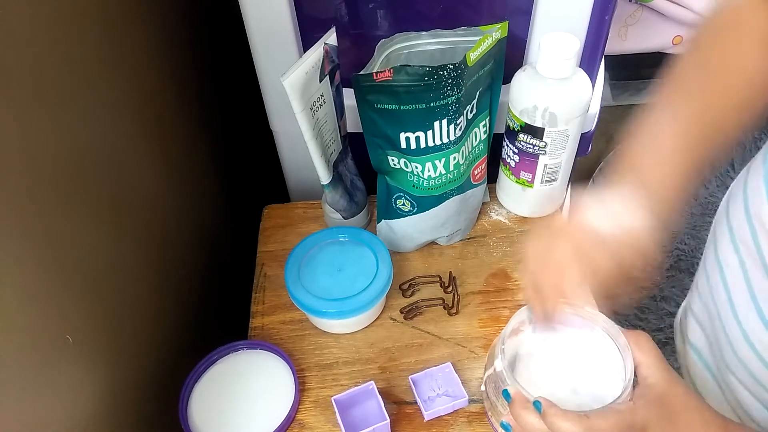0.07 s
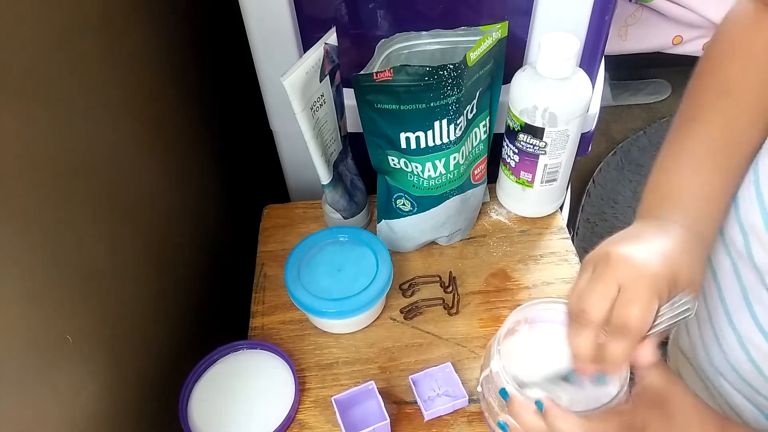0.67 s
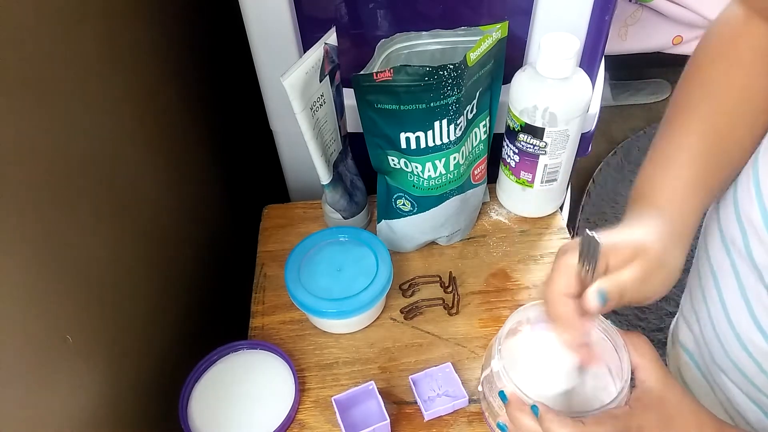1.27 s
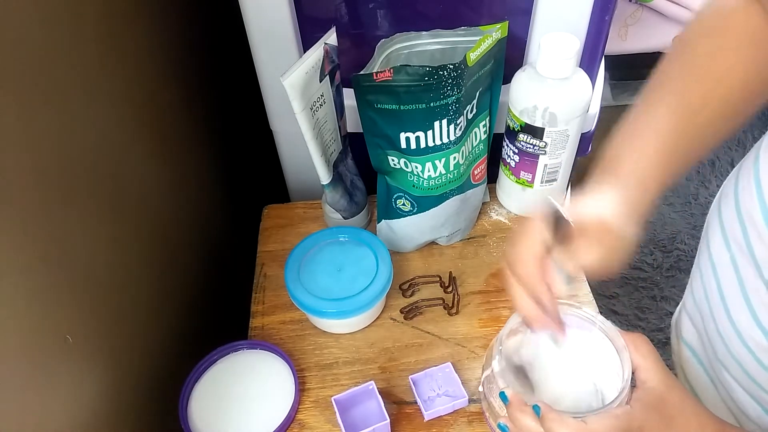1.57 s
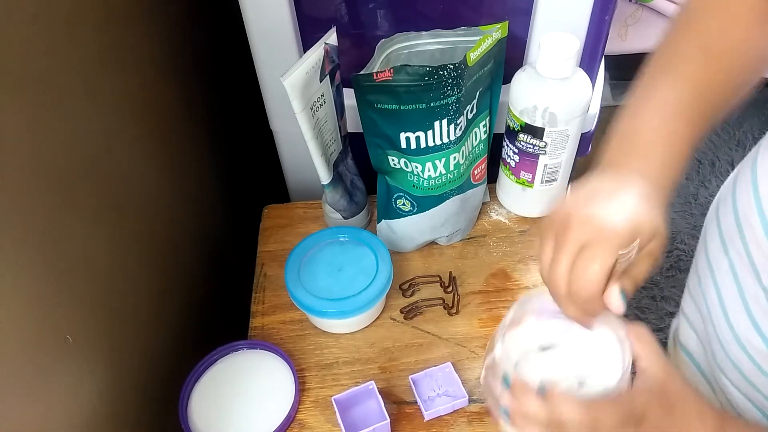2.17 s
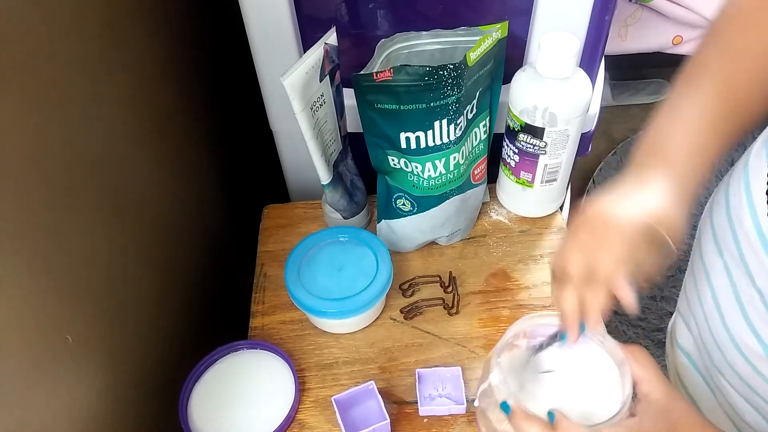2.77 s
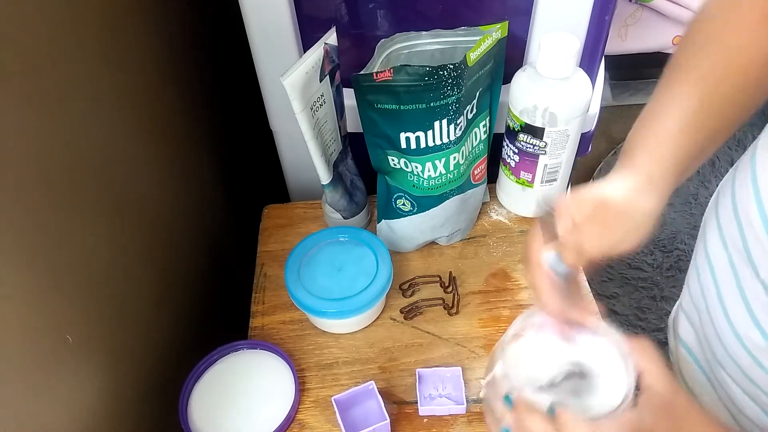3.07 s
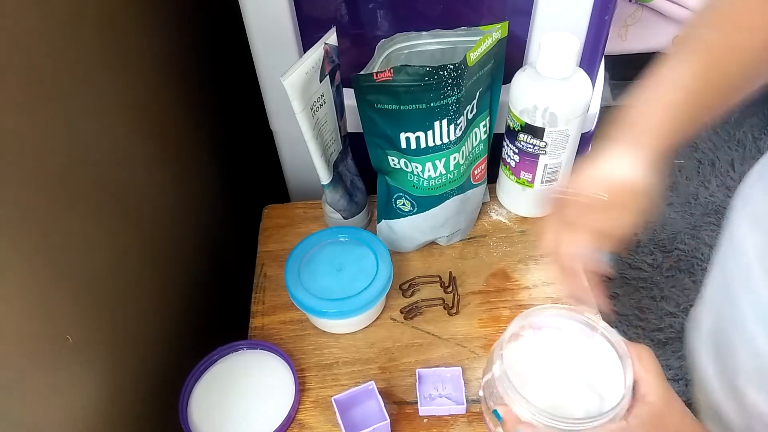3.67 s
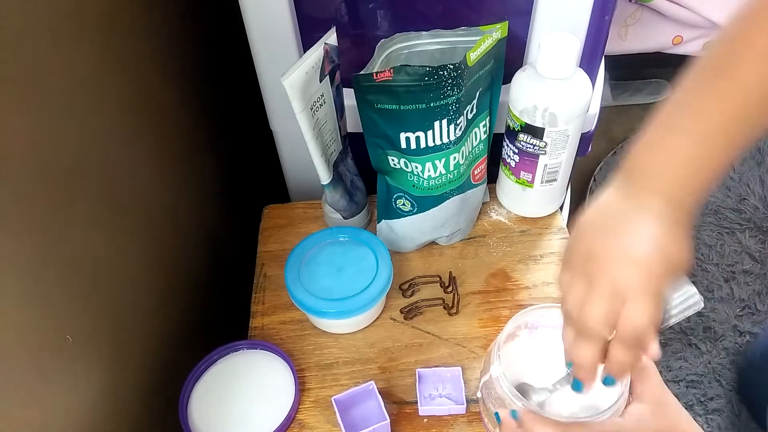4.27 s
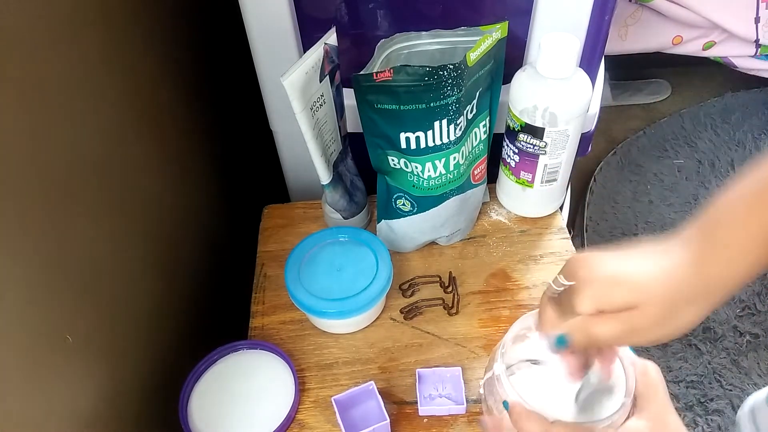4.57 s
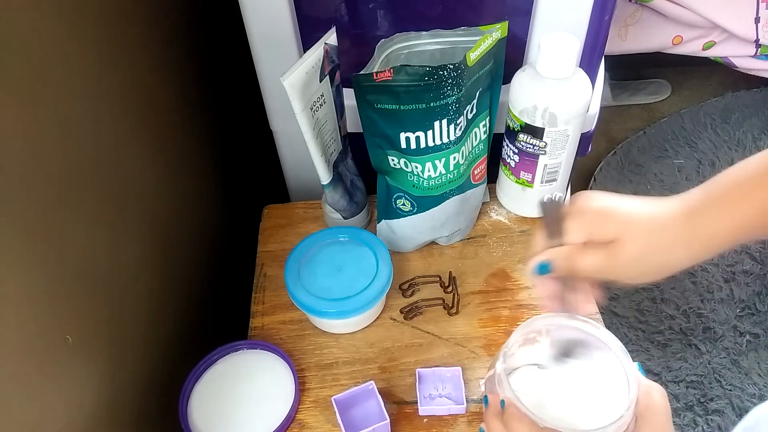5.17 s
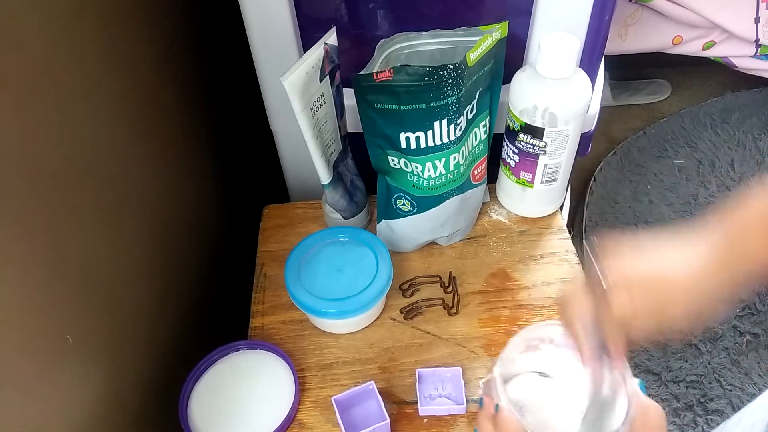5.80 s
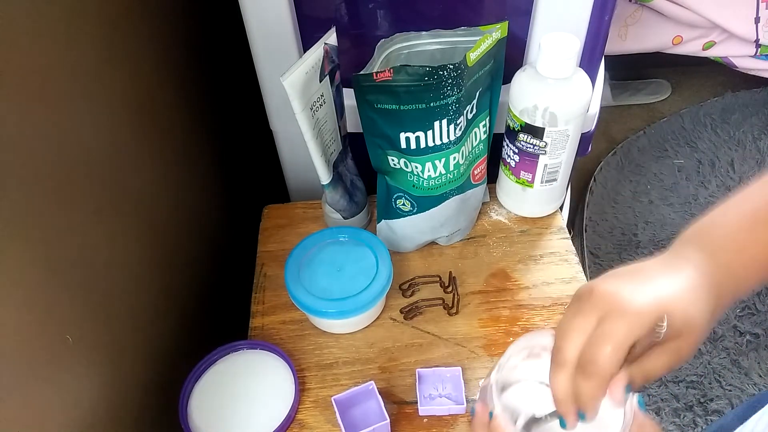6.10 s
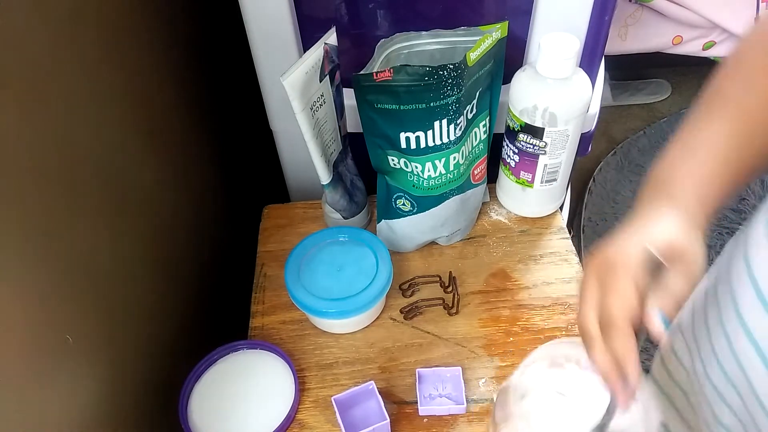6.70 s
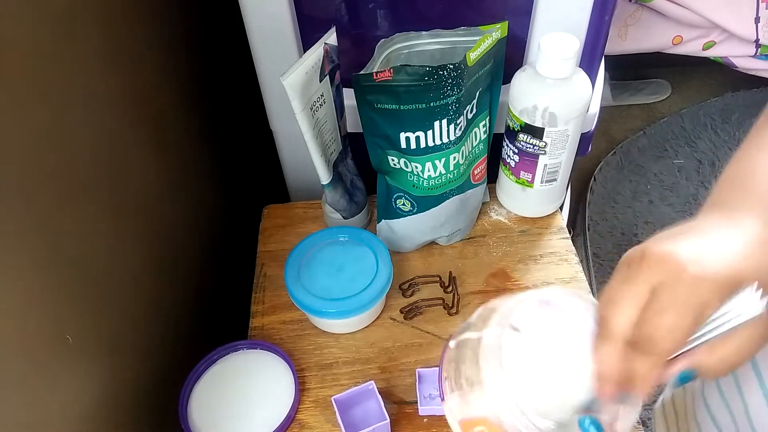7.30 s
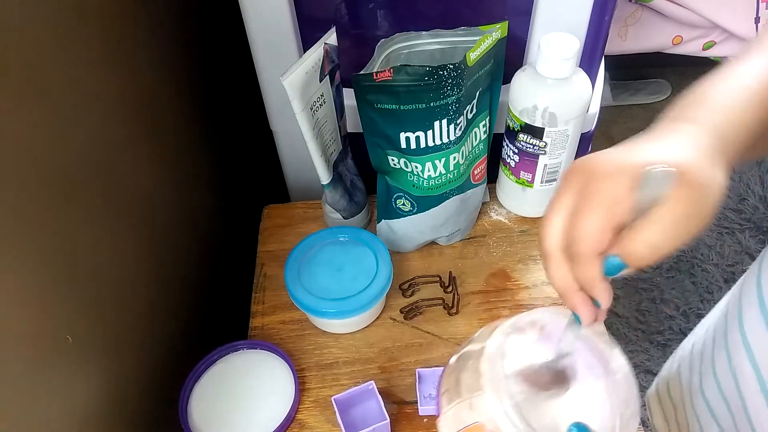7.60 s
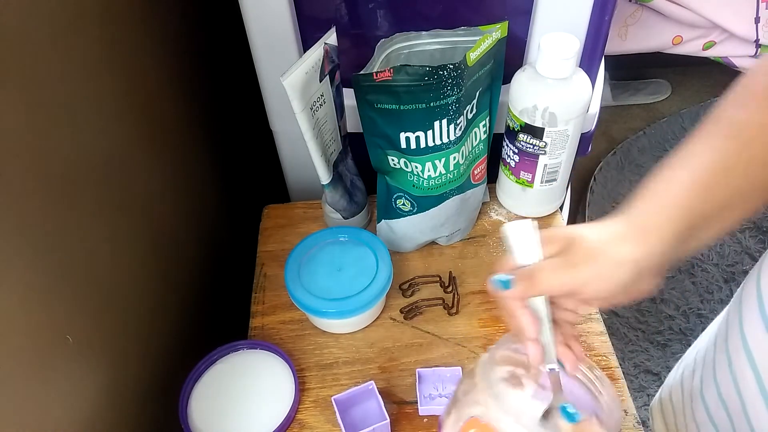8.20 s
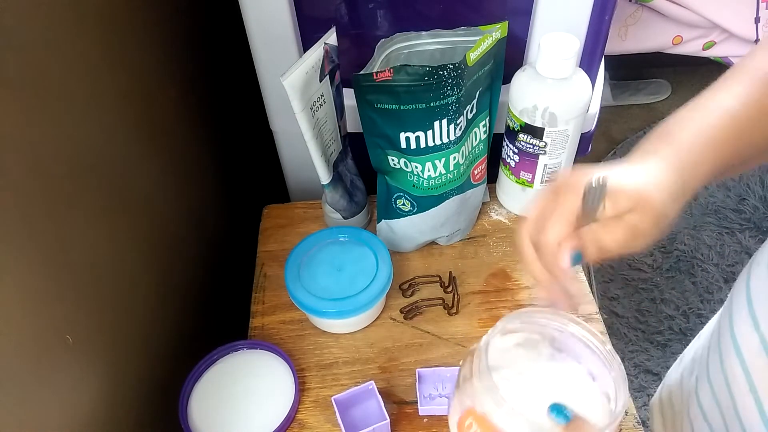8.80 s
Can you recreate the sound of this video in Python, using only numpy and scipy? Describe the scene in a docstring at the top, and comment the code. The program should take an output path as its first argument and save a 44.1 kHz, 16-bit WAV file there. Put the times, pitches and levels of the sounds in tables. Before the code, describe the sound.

Close up in a small room, a metal spoon knocks quickly and irregularly against a plastic cup as it works through slime. Some hits are sharp clacks, others cushioned plops, and the slime fizzes, snaps and gurgles between them. Short gritty scrapes come mostly in the first part. Underneath, the cup bumps a wooden table and slides with a brief low drone. Near the end, plops take over before a last few clacks.

```python
"""First come quick clacks: a metal spoon hits a plastic cup as it stirs sticky slime in a small room.
Bare blows ring the cup wall and pop the air inside; blows cushioned by slime only plop.
Each stroke rubs the wall and makes the slime crackle, snap and gurgle.
The cup is held down on a wooden table: shoves thump the table top, and when the cup drags
it rumbles, then settles into a low drone."""
import sys
import numpy as np
from scipy import signal
from scipy.io import wavfile
from scipy.ndimage import uniform_filter1d

SR = 44100
rng = np.random.default_rng(int(sys.argv[2]) if len(sys.argv) > 2 else 0)


def store_wav(level_fs):
    """Save 16-bit WAV to argv[1]."""
    pcm = np.round(np.clip(np.atleast_2d(level_fs), -1, 1) * 32767)
    wavfile.write(sys.argv[1], SR, pcm.T.astype(np.int16))


N = 390285

# tone of the quiet room: f/Hz, level/dB
ROOM_COLOUR = [(20, -16.5), (70, -7), (200, -7.5), (400, -13), (1200, -18.5), (4000, -23.5), (7500, -19.5),
               (10000, -27), (16000, -50)]
# how long the room rings (t60 is the time to fade by 60 dB): f/Hz, t60/s
ROOM_DECAY = [(150, 0.64), (700, 0.19), (2500, 0.17), (7000, 0.19), (14000, 0.18)]
# early echoes off the table and the room's wall: delay/s, level/dB
EARLY_ECHOES = [(0.0095, -21), (0.023, -19)]

# the cup drags on the table: t/s, length/s, level/dB, starting rumble over drone/dB, drone f/Hz
CUP_DRAGS = [(0.62, 0.29, -45.5, 8, 113.3), (1.762, 0.26, -47, 2.5, 110.7), (2.145, 0.045, -48, 14, 115.3),
             (2.388, 0.097, -60, 1, 89.4), (2.518, 0.081, -47, 2, 110), (2.676, 0.21, -61.5, -4.5, 97.2),
             (3.024, 0.33, -44.5, 3.5, 119.8), (3.629, 0.2, -50, 3, 113), (3.788, 0.093, -45.5, 7.5, 109.9),
             (4.203, 0.083, -45, 2, 118.3), (4.439, 0.057, -53, -4, 115.7), (4.776, 0.075, -52, 26, 108),
             (4.964, 0.085, -57, 7, 97), (5.075, 0.097, -46, 1, 72), (5.732, 0.092, -52, 25, 106),
             (6.155, 0.23, -47, 14, 110.7), (6.593, 0.068, -48, 5, 113.3), (6.724, 0.19, -51, -8.5, 111),
             (7.751, 0.34, -46.5, 0, 110.3), (8.518, 0.36, -51.5, 5, 105.2)]
# tone of the dragging rumble: f/Hz, level/dB
DRAG_COLOUR = [(20, -25.5), (35, -11), (55, -5), (85, -2), (120, -4.5), (170, -1), (240, -12.5), (340, -34),
               (900, -53.5), (3000, -85.5)]
# the cup is shoved against the table: t/s, level/dB, hardness/dB
CUP_SHOVES = [(.008, -42, 5), (0.145, -35.5, -1.5), (0.212, -55.5, -3), (0.319, -51, -1),
              (1.107, -44.5, 3.5), (1.2801, -27.5, 0), (1.358, -39.5, -3.5), (1.593, -42, 0.5),
              (1.687, -53, -2.5), (1.712, -47.5, -3.5), (2.058, -39.5, -2), (2.151, -34.5, 15),
              (2.962, -40, 18), (3.485, -42, 3), (3.61, -42, 3.5), (3.858, -46, 5), (4.35, -33.5, 0.5),
              (4.44, -33.5, 3.5), (4.491, -42.5, 1), (4.735, -49, 8.5), (4.82, -37, 0.5), (5.616, -47, 4.5),
              (5.711, -43.5, 3), (5.828, -29.5, 1), (5.966, -51.5, 4), (6.053, -46.5, 3), (6.16, -26, 0.5),
              (6.591, -33, -1.5), (8.71, -43, 14), (8.787, -43, -1.5)]
# notes the table top rings at: f/Hz, level/dB, t60/s
TABLE_MODES = [(72, -28.5, 0.1), (123, 3, 0.14), (171.5, 5, 0.095), (218.5, 2.5, 0.11), (273, -12, 0.22),
               (338, -3.5, 0.023), (431, -16, 0.062)]

# the spoon slides along the wall: t/s, length/s, level/dB, ring f/Hz, ring width/Hz, air level/dB
WALL_SCRAPES = [(0.463, 0.28, -54.5, 2930, 900, -5), (0.7, .26, -61.5, 2400, 900, -19),
                (1.157, 0.24, -57, 2700, 600, -13), (1.39, 0.29, -64, 2900, 700, -14),
                (1.677, 0.077, -53, 1060, 400, 5), (2.327, 0.17, -49, 1510, 380, -1.5),
                (2.521, 0.031, -48.5, 1724, 261, -8), (2.592, 0.12, -55, 1620, 403, -12),
                (2.811, 0.17, -46, 1920, 492, -6.5), (2.956, 0.12, -35, 4200, 2500, -16),
                (3.319, 0.064, -38, 1890, 260, -13.5), (8.692, 0.058, -48, 2500, 700, 5),
                (8.789, 0.017, -43.5, 2750, 420, -4.5), (8.79, 0.085, -54.5, 2740, 199, -10)]
# the spoon moves through the slime: t/s, length/s, fizz level/dB, smear level/dB, gurgle level/dB
SLIME_STROKES = [(0.017, 0.15, -50.5, -55, -52.5), (0.298, 0.065, -49.5, -55, -60),
                 (0.586, 0.061, -53, -42.5, -50.5), (0.708, 0.27, -52.5, -60, -57),
                 (1.065, 0.16, -53.5, -49.5, -55.5), (1.339, 0.082, -46.5, -46.5, -59.5),
                 (1.573, 0.028, -44.5, -41, -48), (1.694, 0.1, -60.5, -60.5, -62),
                 (2.16, 0.047, -37, -44, -38), (2.211, 0.033, -46.5, -38, -57.5),
                 (2.576, 0.037, -47, -38.5, -53), (2.83, 0.16, -51, -49.5, -45),
                 (2.957, 0.091, -39, -32, -38.5), (3.098, 0.082, -41.5, -37.5, -40.5),
                 (3.325, 0.0072, -46, -47.5, -44.5), (3.599, 0.11, -49, -49, -46.5),
                 (3.846, 0.022, -45, -41.5, -41.5), (3.969, 0.055, -61.5, -65, -73),
                 (4.278, 0.36, -52, -61, -67), (4.399, 0.15, -44, -57, -58.5),
                 (4.693, 0.044, -45, -46, -45.5), (4.882, 0.36, -70, -69, -58),
                 (5.002, 0.072, -65.5, -62.5, -55), (5.057, 0.071, -53, -59.5, -56),
                 (5.209, 0.2, -48.5, -53.5, -50), (5.488, 0.011, -46, -48, -52),
                 (5.598, 0.44, -53, -47.5, -43), (5.785, 0.17, -44.5, -43.5, -42),
                 (6.067, 0.17, -44, -42, -41.5), (6.258, 0.095, -51.5, -53.5, -51),
                 (6.39, 0.035, -60.5, -67, -74), (6.642, 0.1, -47.5, -53.5, -54),
                 (7.39, 0.059, -56, -59, -64), (7.445, 0.099, -48.5, -55, -67), (8.1, 0.089, -52, -50, -61),
                 (8.554, 0.21, -60.5, -58.5, -55.5)]
# tone of the fizz of tearing slime: f/Hz, level/dB
TEARING_COLOUR = [(1500, -38), (3500, -4.5), (5000, -1), (7200, 4.5), (9500, -6), (12000, -9.5),
                  (16000, -15.5)]
# tone of slime smeared on the wall: f/Hz, level/dB
STICKY_COLOUR = [(500, -39), (1100, -12.5), (1700, 3), (2700, 11.5), (4000, 5), (6000, -14), (12000, -39)]
# notes of wet hollows in the slime: f/Hz, width/Hz, level/dB
WET_HOLLOWS = [(490, 160, -0.5), (700, 330, 1.5), (1190, 230, -5)]

# notes of the filled cup's body: f/Hz, level/dB
BODY_MODES = [(428, -12.5), (568, -6.5), (680, -4.5), (900, -12.5), (1145, -24)]
# notes of the cup wall: f/Hz, width/Hz, level/dB
WALL_MODES = [(1380, 29, 1), (2068, 23, -2), (2510, 350, -4.5), (3400, 390, -8.5), (3700, 400, -3),
              (4500, 46, -3), (5350, 63, -7), (6000, 50, -5.5), (7480, 110, -8), (8000, 170, -5.5),
              (8950, 2400, -6)]
# slime on the wall damps those notes, most in dull blows: brightness/dB, extra width/Hz
SLIME_DAMPING = [(-11, 350), (-7, 8.9)]
# tone of a hit on the wall: f/Hz, level/dB
HIT_COLOUR = [(300, -24.5), (900, -5.5), (1400, -9.5), (2500, -1), (4200, -1.5), (7000, 6.5), (9500, -2.5),
              (12500, -8), (16000, -15.5)]
# blows cushioned by slime: t/s, air level/dB, air f/Hz, wall level/dB, body level/dB
SOFT_BLOWS = [(0.313, -56.5, 770, -67, -3), (0.379, -56.5, 720, -74, -6), (1.072, -53.5, 548, -69, 4),
              (1.7135, -41, 914, -53.5, -16), (1.783, -47.5, 760, -52, -22), (2.059, -43, 764, -44.5, -3),
              (2.8671, -23, 896, -26.5, -9), (3.6115, -31.5, 703, -36, -10), (3.961, -62, 1400, -58, -20),
              (4.019, -58, 890, -58.5, -15), (4.349, -42.5, 464, -41.5, 5), (4.439, -40.5, 408, -47, 6),
              (4.489, -45, 646, -63, -8), (4.523, -38.5, 710, -69, -4), (4.733, -57, 515, -47.5, 3),
              (5.278, -39, 810, -41, -16), (5.708, -23.5, 798, -26, -10), (5.831, -34.5, 687, -43, -7),
              (6.141, -46, 765, -44, 4), (6.589, -34.5, 807, -32.5, -2.5), (6.776, -56, 740, -63, -10),
              (7.2352, -25, 846, -36, -10.5), (7.441, -35.5, 795, -45, -9), (7.493, -46, 755, -48.5, -5.5),
              (7.597, -35.5, 751, -59.5, -5.5), (7.892, -34.5, 779, -44, -4), (8.7075, -51, 445, -50, -14),
              (8.7919, -28, 450, -51.5, -13)]
# ticks of the spoon's edge and snaps of slime leaving the wall: t/s, level/dB, brightness/dB, f/Hz
LIGHT_TICKS = [(0.101, -36, -6, 2930), (.132, -39, -16, 3270), (0.312, -43, 8, 4570),
               (0.343, -37, 27, 10200), (0.357, -35.5, 23, 8000), (0.658, -36, 11, 5530),
               (.719, -33.5, 10, 6000), (0.789, -38.5, 19, 8000), (0.868, -32, 12, 5660),
               (0.883, -39, 4, 6500), (0.943, -41, 35, 9400), (1.082, -44, 28, 3520),
               (1.169, -38, 9.5, 6170), (1.2048, -36, 11, 4800), (1.3795, -33, 11, 9100),
               (1.5804, -40, -2, 3720), (1.633, -35.5, -4, 4140), (1.794, -30.5, 13.5, 7450),
               (2.486, -42, -2.5, 1740), (2.785, -55.5, 9.5, 6500), (2.8306, -36, 15.5, 4670),
               (2.868, -30.5, 12, 6700), (2.9679, -20, 10, 5440), (3.03, -36, 12, 4560),
               (3.096, -26.5, 13, 4170), (3.116, -35.5, 1, 3530), (3.122, -28, 30.5, 5910),
               (3.1265, -32.5, 17.5, 8300), (3.681, -35, 1, 6960), (3.689, -39, -4, 4540),
               (3.771, -41, 22, 6400), (3.8202, -38, 11, 6640), (3.8621, -34, 5, 4600),
               (3.8792, -26, 1.5, 7450), (4.4878, -30.5, 6, 7200), (4.53, -35, 14, 5270),
               (4.945, -54, 18, 4540), (5.3538, -33, 12.5, 5540), (5.374, -39.5, 31, 8160),
               (5.5864, -34.5, 9.5, 6200), (5.635, -38, -10, 3100), (5.6425, -34, 2, 2950),
               (5.671, -37, 15.5, 8000), (5.758, -33, 7.5, 6150), (5.7818, -36, 6, 4430),
               (5.872, -26, 12, 6700), (5.8801, -31, 9, 6720), (6.0177, -33.5, 5.5, 7400),
               (6.035, -41.5, 24, 7900), (6.057, -27.5, 8.5, 7100), (6.1155, -33, -6, 5130),
               (6.1395, -27, 21, 6160), (6.276, -37, -1, 2450), (6.671, -41.5, -7, 6890),
               (6.706, -32.5, 26, 7600)]
# bare blows of the spoon: t/s, wall level/dB, brightness/dB, struck spot f/Hz, air level/dB, air f/Hz,
# knock f/Hz, knock level/dB, left minus right/dB
BARE_BLOWS = [(0.0075, -31, 9.5, 5970, -43.5, 423, 2230, -62, -3.5),
              (0.0419, -27, -4.5, 3730, -36, 810, 2220, -49, -2),
              (0.0865, -22, -5.5, 6800, -39.5, 726, 1980, -43.5, 0),
              (0.1385, -24.5, 11.5, 6700, -37.5, 736, 2200, -53, 2),
              (0.574, -25.5, -6.5, 3620, -45, 1084, 1690, -46, 0),
              (1.106, -26, 1, 3900, -38, 740, 1290, -34, 0.5),
              (1.2799, -26, -0.5, 1960, -31, 780, 1224, -34, -1.5),
              (1.3555, -21.5, 11.5, 8280, -38, 510, 2120, -80, -3.5),
              (1.5912, -28, -6.5, 3270, -36.5, 773, 1350, -55, 3),
              (1.8752, -32, 14, 5220, -38, 436, 1710, -57.5, -0.5),
              (1.9709, -19, 0.5, 3260, -30.5, 782, 1630, -39, -0.5),
              (2.152, -16.5, 9, 3740, -25.5, 774, 1410, -52, 0),
              (2.5832, -15, 2.5, 7330, -42, 1050, 1412, -28.5, 0.5),
              (2.9644, -16.5, 28, 5500, -29.5, 910, 2230, -46, 2),
              (3.3308, -17, 4, 3856, -33.5, 890, 1852, -28.5, -3.5),
              (4.268, -32, -6, 6750, -41, 740, 2030, -59, -1.5),
              (4.6685, -35.5, 3, 6230, -47.5, 900, 1840, -51.5, 1.5),
              (4.8227, -18, -1.5, 3410, -24, 700, 1816, -37, -5),
              (5.197, -33.5, 7, 7100, -37.5, 676, 2030.0, -62, 1),
              (5.2299, -25.5, -8, 3060, -29.5, 650, 1830, -39.5, -3),
              (5.2976, -28.5, -2, 2740, -41, 740, 1930.0, -49, 1.5),
              (5.615, -28.5, -3.5, 2670, -33, 680, 1170, -44.5, -2.5),
              (5.6614, -23, 0, 7100, -41, 690, 1940.0, -37, 2.5),
              (5.941, -27, 9, 7300, -40, 850, 2260, -44, 3),
              (5.9663, -23.5, 3.5, 2520, -29, 656, 1820.0, -38, 3),
              (6.05, -14, 1.5, 7000, -31.5, 850, 1930, -36.5, 0.5),
              (6.159, -24.5, 8, 6490, -28.5, 777, 1250, -42.5, 4),
              (6.3238, -28.5, -1, 6940, -41, 748, 1995, -46, -2),
              (8.068, -27, -9, 4060, -22.5, 865, 1373, -42, 5.5),
              (8.0779, -15, 0.5, 6660, -31, 811, 1157, -30, -3.5),
              (8.084, -18, 3.5, 6230, -24, 816, 1260, -36, 2),
              (8.538, -27.5, 6.5, 3300, -31.5, 682, 1290, -57, 7),
              (8.5483, -29.5, -5, 2530, -33.5, 726, 1287, -46, -9),
              (8.6, -32.5, 1, 5770, -39, 690, 1790, -50, 1.5)]

AIR_SIDE_DB = 2  # the cup's air sounds a little to the left
LIFT_S = 6.6  # after this the cup is lifted: its pops move left and its clacks barely shake the table


def amp(db):
    """Turns decibels into a gain."""
    return 10 ** (np.asarray(db) / 20)


def unit_rms(x):
    """Scales a signal to an average strength (rms) of 1."""
    return x / np.sqrt(np.mean(x ** 2) + 1e-20)


def levelled(x, db, samples):
    """Scales a hit so that its first samples have the given level."""
    return x * amp(db) / np.sqrt(np.mean(x[..., :samples] ** 2) + 1e-20)


def panned(side_db):
    """Left and right gains; a positive value moves the sound left."""
    return amp([[side_db / 2], [-side_db / 2]])


def look_up(points, hz):
    """Reads between a table's rows on a log-frequency axis."""
    f, value = np.transpose(points)
    return np.interp(np.log(hz + 1), np.log(f + 1), value)


def add(mix, s, sound):
    """Mixes a sound in at s seconds."""
    part = mix[:, max(round(s * SR), 0):][:, :sound.shape[-1]]
    part += sound[..., :part.shape[1]]


def coloured(x, points):
    """Shapes the tone by (f/Hz, level/dB) points, with no ringing ahead of the sound."""
    log_gain = np.log(amp(look_up(points, abs(np.fft.fftfreq(2048, 1 / SR)))))
    taps = np.fft.ifft(np.exp(np.conj(signal.hilbert(log_gain)))).real
    return signal.fftconvolve(x, taps[None], axes=1)[:, :x.shape[1]]


def resonate(x, hz, width_hz):
    """Rings at one pitch; a narrower width rings longer."""
    pole = np.exp((2j * np.pi * hz - np.pi * width_hz) / SR)
    return 2 * signal.lfilter([1 - abs(pole)], [1, -pole], x).real


def sweep(x, hz, width_hz):
    """Rings at a pitch that follows the curve hz."""
    turn = np.exp(2j * np.pi * np.cumsum(hz) / SR)
    r = np.exp(-np.pi * width_hz / SR)
    return 2 * (turn * signal.lfilter([(1 - r) ** 2], [1, -2 * r, r * r], x / turn)).real


def stereo_noise(samples, alike):
    """Noise whose left and right sides are partly the same."""
    a, b = rng.standard_normal((2, samples))
    return np.array([a, alike * a + np.sqrt(1 - alike ** 2) * b])


def wander(samples):
    """A smooth random curve that changes over about this many samples."""
    return unit_rms(uniform_filter1d(uniform_filter1d(rng.standard_normal(N), samples), samples))


def clumps(depth_db, samples):
    """Uneven gain of slime that sticks and lets go every few milliseconds."""
    return unit_rms(amp(depth_db * np.clip(wander(samples), -2, 2)))


def hand_push(length_s, release_db_per_s, attack_s=0.013, sag_db_per_s=24):
    """Strength of one push of the hand: it bites, weakens while it lasts and lets go."""
    t = np.arange(SR) / SR
    fade_db = sag_db_per_s * t + release_db_per_s * np.maximum(t - length_s, 0)
    return np.minimum(t / attack_s, 1) * amp(-fade_db)


def room_tone(level_db=-79):
    """The faint, steady hush of the room."""
    return amp(level_db) * unit_rms(coloured(stereo_noise(N, alike=0.49), ROOM_COLOUR))


def room_echoes(x, per_s=5000, gap_s=0.0019, rise_s=0.0023):
    """The room returns two early echoes and many tiny ones, each pitch range fading at its own speed."""
    size = 20000
    taps = rng.choice([-1., 1.], (2, size)) * (rng.random((2, size)) < per_s / SR)
    taps *= np.clip((np.arange(size) / SR - gap_s) / rise_s, 0, 1)
    hz, t, bands = signal.stft(taps, SR, nperseg=256)
    fade = amp(-60 * t / look_up(ROOM_DECAY, hz)[:, None])
    tail = signal.istft(bands * fade, SR, nperseg=256)[1]
    tail /= np.linalg.norm(tail[0])
    tail = coloured(tail, [(260, -21), (750, -10), (2200, -8), (7500, -8), (13000, -11)])
    echoes = signal.fftconvolve(x, tail, axes=1)[:, :N]
    dulled = coloured(x, [(300, -6), (800, 7.5), (2500, 1), (9000, -15)])
    for delay, db in EARLY_ECHOES:
        add(echoes, delay, amp(db) * dulled)
    return echoes


def cup_drags(gain_db=2.5, waver=0.0053, smoothing_db_per_s=39.5):
    """The cup rumbles as it jerks loose, drones as it slides evenly, then dies away in the table."""
    out, t = np.zeros((2, N)), np.arange(SR) / SR
    rumble = unit_rms(coloured(stereo_noise(N, alike=0.88), DRAG_COLOUR))
    speed = 1 + waver * wander(2000)
    for s, length, db, jerk_db, hz in CUP_DRAGS:
        now = (int(s * SR) + np.arange(SR)) % N
        drone = unit_rms(np.sin(2 * np.pi * np.cumsum(hz * speed[now]) / SR))
        jerk = amp(jerk_db - smoothing_db_per_s * t)
        pull = amp(db) * hand_push(length, release_db_per_s=167.5, attack_s=0.012)
        add(out, s, pull * (drone + jerk * rumble[:, now]) / np.hypot(1, jerk))
    return amp(gain_db) * out * amp([[-1.0], [0.9]])


def table_thumps(shake_db=-15, lifted_db=-8, shake_hardness_db=1.5, rise_s=0.0018):
    """Shoves, and clacks more faintly, ring the table top; harder ones bring out its higher notes."""
    out, t = np.zeros((2, N)), np.arange(9000) / SR
    shakes = [(s, air_db + shake_db + lifted_db * (s > LIFT_S), shake_hardness_db)
              for s, _, _, _, air_db, *_ in BARE_BLOWS]
    for s, db, hardness_db in CUP_SHOVES + shakes:
        db_per_octave = (hardness_db + 4.5) * 2.2
        ring = np.zeros(len(t))
        for k, (hz, mode_db, t60) in enumerate(TABLE_MODES):
            fade = amp(mode_db + db_per_octave * np.log2(hz / 180) - 60 * t / t60)
            ring += (-1) ** k * fade * np.sin(2 * np.pi * hz * rng.uniform(0.93, 1.04) * t)
        add(out, s - 0.001, levelled(ring * (1 - np.exp(-t / rise_s)), db, samples=1100))
    return out * amp([[-1.2], [1.0]])


def wall_scrapes(air_hz=790, grit_hz=3200, grit_gain=0.4):
    """Gritty, uneven rubbing rings one wall note and the cup's air; the pitches rise a little."""
    out = np.zeros((2, N))
    rubbing = stereo_noise(N, alike=0.18) * clumps(depth_db=6, samples=300)
    rubbing = np.tile(rubbing, 2)
    for s, length, db, hz, width_hz, air_db in WALL_SCRAPES:
        rub = rubbing[:, int(s * SR):][:, :int(length * SR)]
        slide = np.linspace(0.95, 1.05, rub.shape[1])
        wall = unit_rms(sweep(rub, hz * slide, width_hz))
        air = amp(air_db) * unit_rms(sweep(rub, air_hz * slide, width_hz=150)) * panned(AIR_SIDE_DB)
        grit = grit_gain * unit_rms(sweep(rub, grit_hz * slide, width_hz=2200))
        add(out, s, amp(db) * unit_rms(wall + air + grit) * signal.windows.tukey(rub.shape[1], 0.8))
    return out


def tearing(bursts_per_s=170, burst_s=0.0012):
    """Slime tears in clumps of fine hiss, with a few bursting films among them."""
    sizes = amp(4 * np.minimum(rng.exponential(1, N), 3))
    starts = rng.random(N) < bursts_per_s / SR
    bursts = signal.lfilter([1], [1, -np.exp(-1 / (burst_s * SR))], sizes * starts)
    return stereo_noise(N, alike=0.5) * (clumps(depth_db=3, samples=260) + 0.45 * unit_rms(bursts))


def bubbles(per_s=100, low_hz=1300, high_hz=8000, pitches=24, cycles=4, glide_per_s=60):
    """Tiny bubbles burst at random, each a rising snap that the thick slime damps within a few cycles."""
    out, t = np.zeros((2, N)), np.arange(500) / SR
    per_pitch = int(per_s * N / SR / pitches)
    for hz in np.geomspace(low_hz, high_hz, pitches):
        chirp = np.sin(2 * np.pi * hz * t * (1 + glide_per_s * t / 2))
        snap = chirp * np.exp(-hz * t / cycles) * np.sqrt(hz)
        for when, faintness, side in rng.random((200, 3))[:per_pitch]:
            gain = amp(-9 * np.log(faintness + 0.058))  # a few loud ones, many quiet ones
            add(out, when * N / SR, snap * gain * np.sqrt([[side], [1 - side]]))
    return unit_rms(out)


def slime_pressure(after_clack_db=-30, after_clack_s=0.022, settle_db=-27):
    """Strokes press the slime, and a brief hiss lingers after each clack; afterwards it settles faintly."""
    push_power, settle_power = np.zeros((3, N)), np.zeros((1, N))
    after_clacks = [(s, after_clack_s, db + after_clack_db, db + after_clack_db, air_db + after_clack_db)
                for s, db, _, _, air_db, *_ in BARE_BLOWS]
    for s, length, fizz_db, smear_db, gurgle_db in SLIME_STROKES + after_clacks:
        push = amp([[fizz_db], [smear_db], [gurgle_db]]) * hand_push(length, release_db_per_s=294)
        settle = amp(fizz_db + settle_db) * hand_push(length, release_db_per_s=53.5)
        add(push_power, s, push ** 2)
        add(settle_power, s, settle ** 2)
    return np.sqrt(push_power), np.sqrt(settle_power)


def slime(fizz_db=-1, smear_db=-4, bubble_db=-8.5, gurgle_db=-1):
    """Stirred slime fizzes as films tear, smears on the wall, bursts bubbles and gurgles in hollows."""
    (fizz_push, smear_push, gurgle_push), settling = slime_pressure()
    tear = tearing()
    # pockets change size as the spoon moves, so their pitches slide
    films = sum(sweep(tear, hz * np.exp(0.16 * wander(1500)), 0.16 * hz) for hz in (1800, 3100, 6400))
    fizz = unit_rms(coloured(tear + films, TEARING_COLOUR))
    smear = unit_rms(coloured(1.2 * tear + 2 * films, STICKY_COLOUR))
    gurgle = np.zeros((2, N))
    for hz, width_hz, db in WET_HOLLOWS:
        gain = amp(db) * clumps(depth_db=5, samples=400)
        gurgle += gain * sweep(tear, hz * np.exp(0.12 * wander(1200)), width_hz)
    return (fizz * (amp(fizz_db) * fizz_push + settling)
            + (amp(smear_db) * smear + amp(bubble_db) * bubbles()) * smear_push
            + amp(gurgle_db) * unit_rms(gurgle) * gurgle_push * panned(AIR_SIDE_DB))


def air_pops(clack_rise_s=0.00062, clack_t60_s=0.041, plop_rise_cycles=1.5, plop_ring_cycles=30,
             body_t60_s=0.05, delay_s=0.00045, lifted_side_db=2):
    """The air above the slime rings at a pitch set by the hollow, and shakes the body of the cup."""
    out, t = np.zeros((2, N)), np.arange(5000) / SR
    lag = np.array([[0], [1.0]])  # the right side trails by one radian
    blows = [(s, db, hz, clack_rise_s, clack_t60_s, 0) for s, _, _, _, db, hz, *_ in BARE_BLOWS]
    blows += [(s, db, hz, plop_rise_cycles / hz, plop_ring_cycles / hz, body_db)
              for s, db, hz, _, body_db in SOFT_BLOWS]
    for s, db, hz, rise, t60, body_db in blows:
        ring = np.sin(2 * np.pi * hz * t - lag) * amp(-60 * t / t60)
        for mode_hz, mode_db in BODY_MODES:
            fade = amp(mode_db + body_db - 60 * t / body_t60_s)
            ring += fade * np.sin(2 * np.pi * (mode_hz * t + rng.random()) - lag)
        pop = levelled(ring * (1 - np.exp(-(t / rise) ** 2)), db, samples=441)
        side_db = AIR_SIDE_DB + lifted_side_db * (s > LIFT_S)
        add(out, s + delay_s - rise / 2, pop * panned(side_db))
    return out


def wall_knocks(flex_db=-1, flex_t60_s=0.054, spot_db=-11, spot_t60_s=0.015, rise_s=0.00066):
    """A bare blow rings the flexing wall and the struck spot; grip and place of contact set the pitches."""
    out, t = np.zeros((2, N)), np.arange(4000) / SR
    onset = 1 - np.exp(-t / rise_s)
    for s, wall_db, _, spot_hz, _, _, knock_hz, knock_db, _ in BARE_BLOWS:
        flex = (knock_hz, flex_t60_s, knock_db + flex_db, 441)
        spot = (spot_hz, spot_t60_s, wall_db + spot_db, 220)
        for hz, t60, db, samples in (flex, spot):
            tone = np.sin(2 * np.pi * (hz * t + rng.random((2, 1)) / 2))
            add(out, s, levelled(tone * amp(-60 * t / t60) * onset, db, samples))
    return out


def cup_wall(x, damping_hz, direct=0.32):
    """The wall rings; the place of contact, left to chance, decides how strong each note is."""
    chance = rng.standard_normal((len(WALL_MODES), 2)) * [3, 0.025]
    notes = sum(amp(db + more_db) * resonate(x, hz * (1 + detune), width_hz + damping_hz)
                for (hz, width_hz, db), (more_db, detune) in zip(WALL_MODES, chance))
    return direct * x + notes


def spoon_clacks(crack_db=11, crack_s=0.0009, chatter_s=0.0027, tail_db=-23, tail_s=0.0071,
                 bare_rise_s=0.00062, soft_rise_s=0.0024, plop_bright_db=-13, plop_spot_hz=1290,
                 light_side_db=-0.16):
    """Each contact is one sharp crack and a brief chatter in the cup wall; slime cushions the dull ones."""
    out, t = np.zeros((2, N)), np.arange(2200) / SR
    fade = np.exp(-t / chatter_s) + amp(tail_db) * np.exp(-t / tail_s)
    # a blow rings the whole wall, a tick more around its own pitch: level/dB, width/Hz
    blow_spot, tick_spot = (-1, 600), (1, 1300)
    contacts = [(*row[:4], blow_spot, row[-1]) for row in BARE_BLOWS]
    contacts += [(*row, tick_spot, light_side_db) for row in LIGHT_TICKS]
    contacts += [(s, wall_db, plop_bright_db, plop_spot_hz, blow_spot, light_side_db)
                 for s, _, _, wall_db, _ in SOFT_BLOWS]
    for s, db, bright_db, spot_hz, (spot_db, width_hz), side_db in contacts:
        rise = np.interp(bright_db, [-15, -6], [soft_rise_s, bare_rise_s])
        damping_hz = np.interp(bright_db, *np.transpose(SLIME_DAMPING))
        chatter = stereo_noise(len(t), alike=0.057)
        chatter[:, round(crack_s * SR)] = amp(crack_db) * rng.choice([-1, 1], 2)
        hit = cup_wall(chatter * fade * (1 - np.exp(-t / rise)), damping_hz)
        hit += amp(spot_db) * resonate(hit, spot_hz, width_hz)
        tilt = [(2200, 2 - bright_db / 2), (3400, 0.0095), (5200, 0), (7500, -9 + bright_db / 2)]
        hit = coloured(coloured(hit, HIT_COLOUR), tilt)
        hit[1] = np.roll(hit[1], 3)  # the cup is nearer the left, so the right side hears it later
        add(out, s - 0.0002, levelled(hit, db, samples=220) * panned(side_db))
    return out


def scene():
    """All the sounds of the cup, their echoes and the quiet room."""
    near = spoon_clacks() + wall_knocks() + air_pops() + table_thumps() + slime() + wall_scrapes()
    return near + room_echoes(near) + cup_drags() + room_tone()


def record(dry):
    """Cuts the very highest treble, above 15900 Hz."""
    low_pass = signal.firwin(255, 15900, window=("kaiser", 8), fs=SR)
    return signal.oaconvolve(dry, low_pass[None], "same", axes=1)


dry = scene()
out = record(dry)
store_wav(out)
```